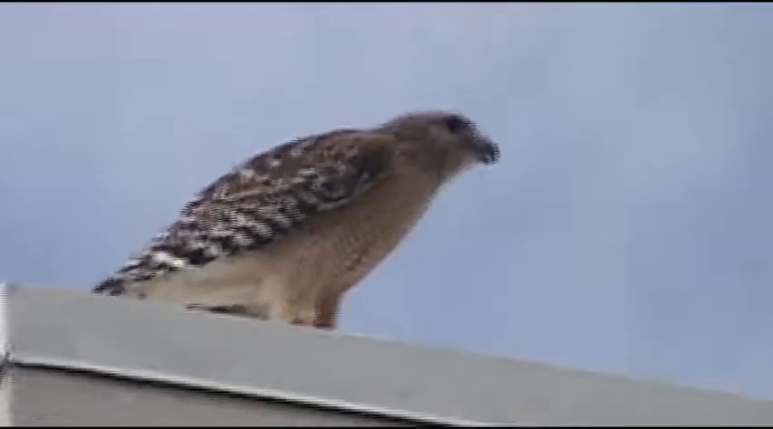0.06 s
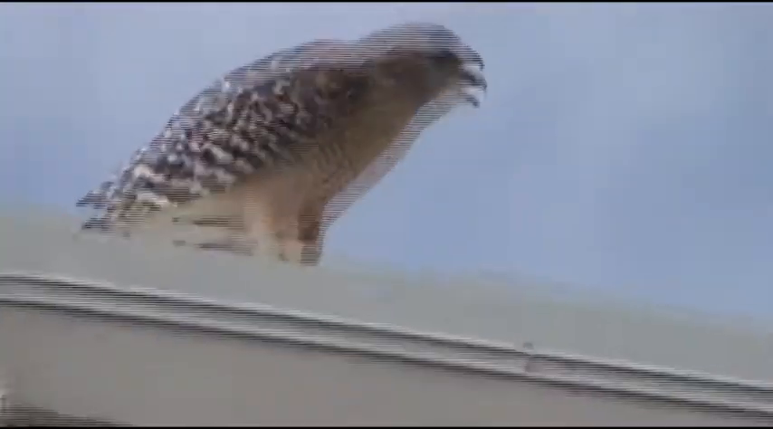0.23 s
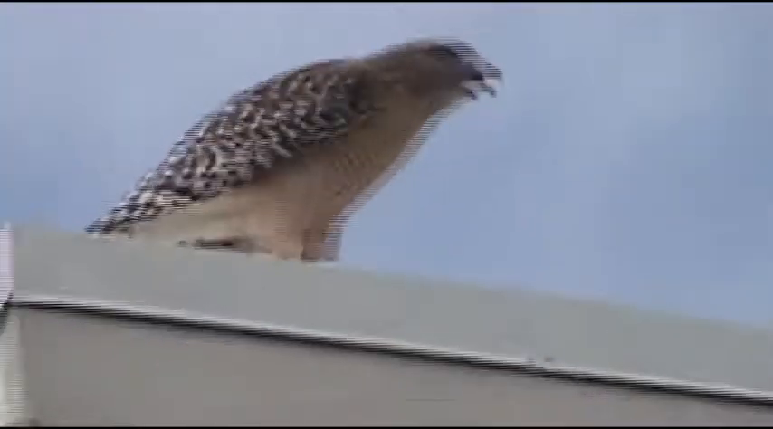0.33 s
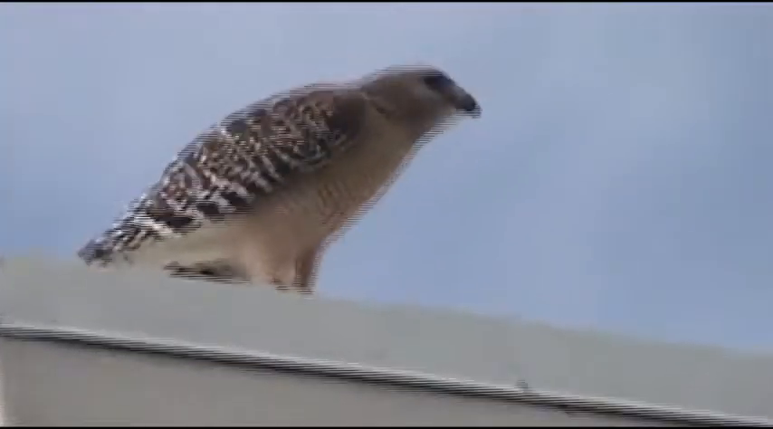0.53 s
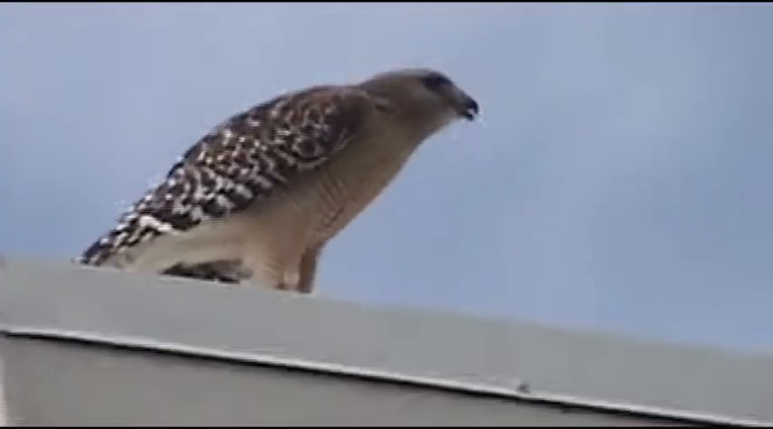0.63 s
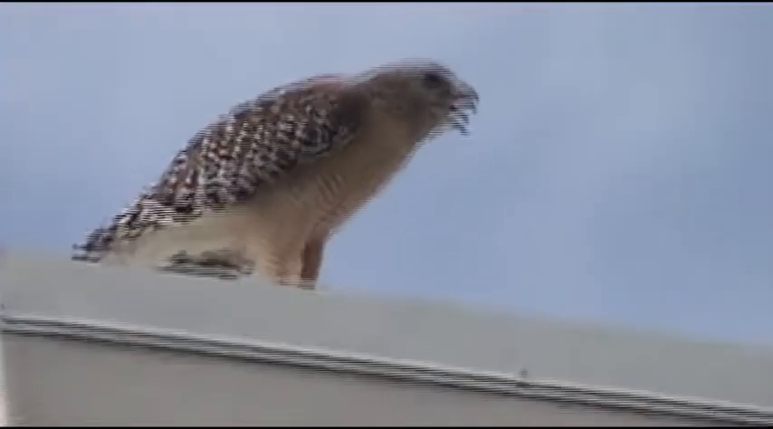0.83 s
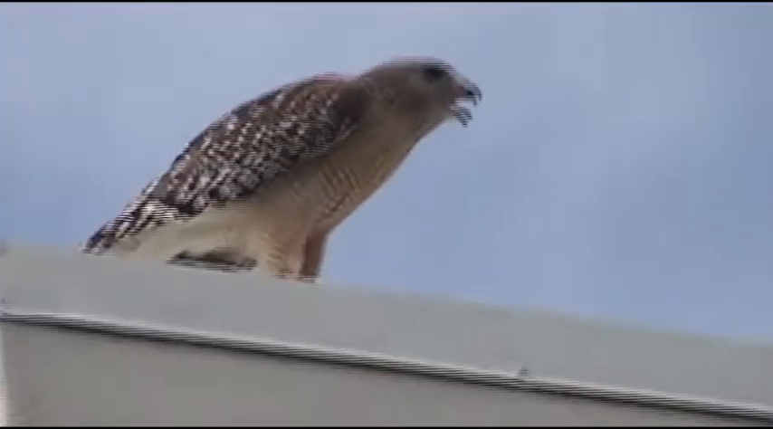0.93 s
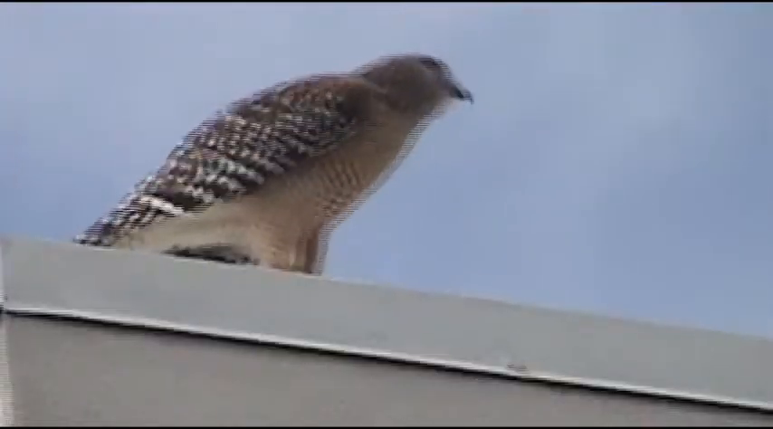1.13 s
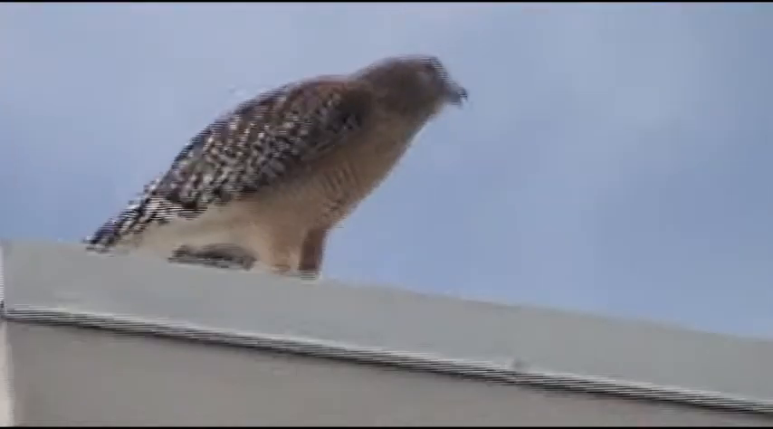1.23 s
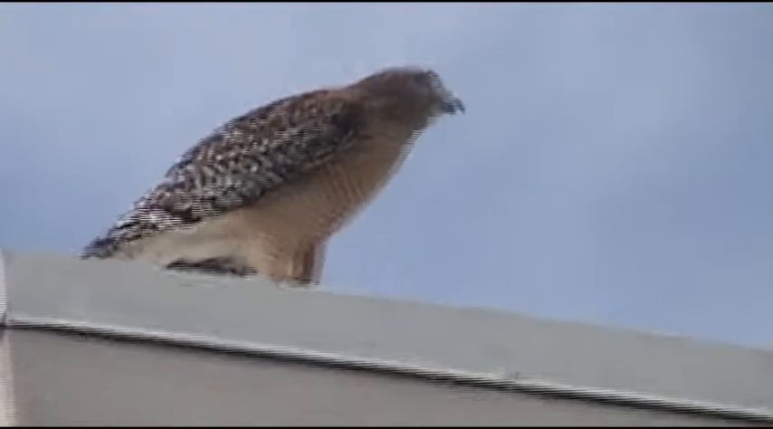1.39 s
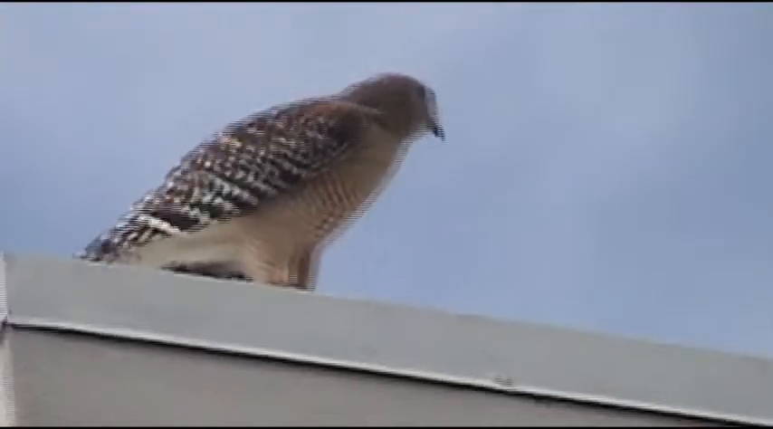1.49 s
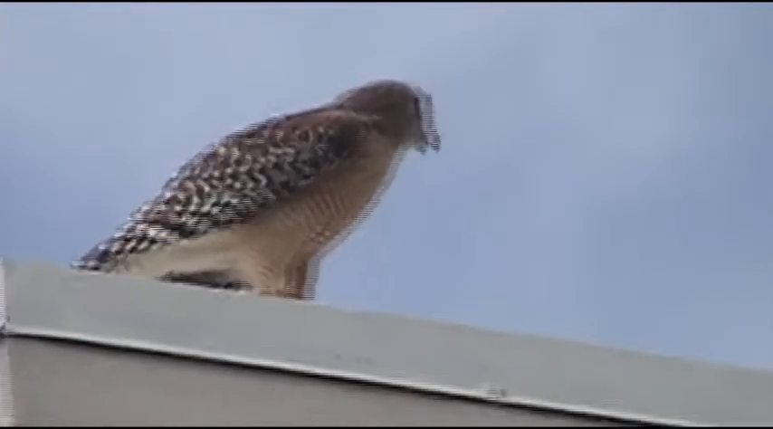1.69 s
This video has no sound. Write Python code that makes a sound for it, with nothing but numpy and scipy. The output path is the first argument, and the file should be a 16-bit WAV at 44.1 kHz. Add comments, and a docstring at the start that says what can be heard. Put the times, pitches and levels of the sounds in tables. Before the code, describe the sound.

Two hoarse, rising and falling hawk screeches, with faint echo and soft wind beneath.

```python
"""Outdoors among houses, a hawk on a roof edge gives two harsh "kee-ah" cries.
Each cry rises, cracks into a rasp where the second side of the syrinx whistles along, then drops
to a clean falling note. Nearby walls answer at once and the neighbourhood rings on faintly.
Underneath are a low wind rumble, a distant wash, faint far hums and a few small ticks."""
import sys
import numpy as np
from scipy import signal
from scipy.fft import rfft, irfft
from scipy.io import wavfile
from scipy.ndimage import uniform_filter1d

SR = 44100
rng = np.random.default_rng(int(sys.argv[2]) if len(sys.argv) > 2 else 0)


def transcribe(signal):
    """Save signal, clipped to [-1, 1], as a 16-bit WAV file at the path in sys.argv[1]."""
    frames = np.atleast_2d(signal).T
    limited = np.clip(frames, -1, 1)
    pcm = np.round(limited * 32767).astype(np.int16)
    wavfile.write(sys.argv[1], SR, pcm)


N = 77175


def amp(db):
    """Decibels to gain."""
    return 10 ** (np.asarray(db) / 20)


def unit(x):
    """Scales to rms 1."""
    return x / np.sqrt(np.mean(abs(x) ** 2) + 1e-20)


def read(points, hz):
    """Reads a table on a log-frequency axis."""
    f, value = np.transpose(points)
    return np.interp(np.log(hz + 1), np.log(f + 1), value)


def add(mix, start_s, sound):
    """Mixes a sound in at start_s."""
    part = mix[max(round(start_s * SR), 0):][:len(sound)]
    part += sound[:len(part)]


def wobble(size, hz):
    """Complex random motion no faster than about hz, rms 1."""
    f = np.fft.fftfreq(size, 1 / SR)
    noise = rng.standard_normal(size) + 1j * rng.standard_normal(size)
    return unit(np.fft.ifft(np.fft.fft(noise) / (1 + (f / hz) ** 2)))


def soften(control, width_s=0.0036):
    """Rounds the steps of a control."""
    return uniform_filter1d(control, int(width_s * SR), axis=-1, mode="nearest")


def stereo_pair(a, b, correlation):
    """Left and right from two independent noises."""
    return np.array([a, correlation * a + np.sqrt(1 - correlation ** 2) * b])


# Outdoor noise spectrum. Each row: frequency in Hz, relative density in dB.
AIR_SPECTRUM_DB = [(13, -31), (22, -14), (64, -7), (133, -7), (222, -10), (253, -11), (306, -10),
                   (538, -15.5), (599, -12.5), (667, -13.5), (1300, -20.5), (1900, -26.5), (2490, -24.5),
                   (3430, -30.5), (9520, -43.5), (11500, -52), (13500, -89.5)]
# Stereo width. Each row: frequency in Hz, left-right correlation.
AIR_CORRELATION = [(25, 0.63), (70, 0.99), (150, 0.98), (300, 0.93), (600, 0.64), (1300, 0.69),
                   (3000, 0.23), (7000, 0.23)]
# Rumble and wash envelopes. Each row: time in seconds, level in dB.
WIND_LEVEL_DB = [(0.0, -37), (0.594, -39.5), (0.642, -37.5), (0.848, -41), (1.306, -38), (1.598, -43.5),
                 (1.75, -42.5)]
WASH_LEVEL_DB = [(0.0, -47.5), (0.014, -40.5), (0.13, -43.5), (1.676, -42.5), (1.75, -44)]


def wind_and_wash(crossover_hz=265):
    """Low wind rumble and a distant wash above it, both easing off slowly."""
    hz, t = np.fft.rfftfreq(N, 1 / SR), np.arange(N) / SR
    a, b = rfft(rng.standard_normal((2, N)))
    spectrum = stereo_pair(a, b, read(AIR_CORRELATION, hz)) * amp(read(AIR_SPECTRUM_DB, hz))
    low = 1 / (1 + (hz / crossover_hz) ** 8)
    return sum(amp(np.interp(t, *np.transpose(levels))) * unit(irfft(spectrum * band, N))
               for levels, band in [(WIND_LEVEL_DB, low), (WASH_LEVEL_DB, 1 - low)])


# Far hums. Each row: start in seconds, end in seconds, frequency in Hz, level in dB.
FAR_HUMS = [(0, .13, 604, -45), (0, .04, 192, -36), (.05, 1.45, 130, -48)]


def far_hums(waver_hz=13, fade_s=0.01):
    """Faint tones from far off, wavering in level and phase."""
    t, out = np.arange(N) / SR, np.zeros(N)
    for start, end, hz, db in FAR_HUMS:
        tone = (np.exp(2j * np.pi * hz * t) * (1 + wobble(N, waver_hz))).real
        gate = np.clip(np.minimum(t - start, end - t) / fade_s + .5, 0, 1)
        out += amp(db) * unit(tone) * gate
    return out


# Small ticks. Each row: peak time in seconds, centre frequency in Hz, gain in dB.
SMALL_TICKS = [(.013, 8000, -46), (.014, 3180, -40), (.178, 7300, -48), (.832, 3514, -32)]


def ticks(rise_s=0.0006):
    """Faint ticks, each a brief burst of narrow-band noise."""
    t, out = np.arange(900) / SR, np.zeros(N)
    envelope = t / rise_s * np.exp(2 - t / rise_s) / 2
    for peak_s, hz, db in SMALL_TICKS:
        ring = (wobble(len(t), hz=810) * np.exp(2j * np.pi * hz * t)).real
        add(out, peak_s - rise_s, amp(db) * ring * envelope)
    return out


# Wall echoes. Each row: nominal delay in seconds, gain in dB.
WALL_ECHOES = [(.0045, -18.5), (.009, -14.5), (.014, -35), (0.02, -23.5), (.033, -28.5), (.052, -22),
               (.078, -20)]
# Scatter spectrum. Each row: frequency in Hz, relative level in dB.
SCATTER_COLOUR_DB = [(1300, -1), (2200, 4), (2550, -1.5), (3100, 0), (4000, 0), (6400, 1.5), (9000, 1)]
# Scatter decay. Each row: frequency in Hz, time to fall 60 dB in seconds.
SCATTER_T60_S = [(1200, 2.94), (2500, 1.37), (4000, 0.87), (7000, 1.3), (13000, 0.48)]


def surroundings(voice, scatter_db=-18):
    """A few wall echoes and a long, faint, uneven scatter from houses and trees."""
    noise = stereo_pair(*rng.standard_normal((2, N)), correlation=0.52)
    hz, t, spectra = signal.stft(noise, SR, nperseg=256)
    decay_db = read(SCATTER_COLOUR_DB, hz)[:, None] - 60 * t / read(SCATTER_T60_S, hz)[:, None]
    response = signal.istft(spectra * amp(decay_db), SR, nperseg=256)[1]
    response *= amp(unit(wobble(response.shape[1], hz=25).real))  # 1 dB rms of unevenness
    response *= amp(scatter_db) / np.linalg.norm(response[0])
    for delay_s, db in WALL_ECHOES:
        for side in response:
            add(side, delay_s * rng.uniform(0.95, 1.03), amp([db]))
    return signal.fftconvolve(voice[None], response, axes=1)[:, :N]


# Direct-path balance. Each row: frequency in Hz, left minus right in dB.
BALANCE_DB = [(1200, 0.3), (2400, 3.5), (3100, -0.5), (4100, -2.5), (7500, 0.5), (13000, -0.5)]
# Direct-path phase. Each row: frequency in Hz, left lead in radians.
LEFT_LEAD_RAD = [(1200, 0), (1700, -0.11), (2800, -0.35), (4300, -0.49), (7000, 0.36), (9000, 0)]


def direct_path(voice):
    """The direct sound reaches left and right with slightly different level and phase."""
    hz = np.fft.rfftfreq(N, 1 / SR)
    lean = amp(read(BALANCE_DB, hz) / 2) * np.exp(.5j * read(LEFT_LEAD_RAD, hz))
    return irfft(rfft(voice) * np.array([lean, 1 / lean]), N)


# Breath spectrum. Each row: frequency in Hz, relative level in dB.
BREATH_SPECTRUM_DB = [(900, -32), (1900, -23), (2500, -11.5), (3100, -2.5), (3600, -11.5), (6500, -12),
                      (8500, -32), (11000, -34), (13000, -42)]


def breath(throat_db, rough):
    """Air hissing in the throat, louder as the voice roughens."""
    size = len(rough)
    shape = amp(read(BREATH_SPECTRUM_DB, np.fft.rfftfreq(size, 1 / SR)))
    hiss = unit(irfft(rfft(rng.standard_normal(size)) * shape, size))
    return amp(throat_db - 27 + 19 * rough) * hiss


# Whistles. Each row: start and end in seconds, start and end pitch in Hz, share of throat-band power.
SYRINX_WHISTLES = [(.273, .293, 2480, 2470, .9), (.369, .377, 2480, 2470, .4),
                   (.939, .945, 2460, 2500, .65), (.944, .959, 3200, 3140, .6)]


def syrinx_whistle(t, octave_db=-20):
    """The second side of the syrinx whistles; returns the tone and the power share it takes."""
    tone, taken = np.zeros((2, len(t)))
    for start, end, from_hz, to_hz, share in SYRINX_WHISTLES:
        power = abs(soften(share * ((t > start) & (t < end))))
        phase = 2 * np.pi * np.cumsum(np.interp(t, [start, end], [from_hz, to_hz])) / SR
        tone += np.sqrt(power) * (np.sin(phase) + amp(octave_db) * np.sin(2 * phase))
        taken += power
    return tone, taken


JITTER_HZ, RASP_HZ, FRAY_HZ = 340, 290, 9000


def syrinx_partials(pitch_hz, rough, doubling, tripling, odd):
    """Jittering harmonics; period doubling and tripling put half and third partials between them."""
    size = len(pitch_hz)
    jitter = (.0012 + .04 * rough) * wobble(size, JITTER_HZ).real
    cycles = np.cumsum(pitch_hz * (1 + jitter)) / SR
    partials = []
    for k in range(1, 13):
        partials += [(k, odd if k % 2 else np.ones(size)), (k + 1 / 2, doubling),
                     (k + 1 / 3, tripling / 2), (k + 2 / 3, tripling)]
    multiples, weights = map(np.array, zip(*partials))
    hz = np.outer(multiples, pitch_hz)
    rasps = np.clip(rough + .55 / (1 + (FRAY_HZ / hz) ** 8), 0, 1)  # the highest partials fray more
    waves = []
    for multiple, rasp in zip(multiples, rasps):
        carrier = np.exp(2j * np.pi * (multiple * cycles + rng.random()))
        waves.append((carrier * (np.sqrt(1 - rasp ** 2) + rasp * wobble(size, RASP_HZ))).real)
    return np.array(waves), hz, weights * (hz < SR / 2)


# Low, throat and treble bands of the voice. Each row: frequency in Hz, relative level in dB.
LOW_BAND_DB = [(500, -25), (900, -19.5), (1150, -7.5), (1580, -1.5), (1900, -12), (2500, -59)]
THROAT_BAND_DB = [(1300, -49.5), (1800, -6), (2050, -15), (2250, -3.5), (3150, -9), (3450, -22.5),
                  (3900, -43), (5000, -77)]
TREBLE_BAND_DB = [(2400, -49), (3100, 3.5), (3600, 1), (4700, -0.5), (5500, -6.5), (6400, -5.5),
                  (7300, -10.5), (8200, -22.5), (10500, -31.5), (11500, -33.5), (12400, -31.5),
                  (13400, -26.5), (13900, -28.5), (14500, -57)]


def throat_filter(waves, hz, weights, band_gains):
    """The throat shapes the partials in three bands, each with its own gain."""
    gains = 0
    for gain, shape in zip(band_gains, [LOW_BAND_DB, THROAT_BAND_DB, TREBLE_BAND_DB]):
        band = weights * amp(read(shape, hz))
        gains += gain * band / np.sqrt((band ** 2).sum(0) + 0.063)
    return (gains * waves).sum(0)


# Voice registers, each held until the next. Each row: start in seconds, then roughness,
# period doubling, period tripling and odd-harmonic weight, all 0-1.
VOICE_REGISTERS = [(.2, .45, .35, 0, 1), (.229, .2, .06, 0, 1), (.241, .27, .42, 0, 1),
                   (.256, .1, .14, 0, 1), (.266, .25, .1, .05, .8), (.272, .27, .08, .8, .5),
                   (.292, .14, .03, .1, .2), (.309, .25, .05, .08, .4), (.32, .1, .1, .05, .12),
                   (.35, .22, .1, .1, .15), (.376, .05, 0, 0, 1), (.435, .42, .3, 0, 1),
                   (.83, .55, .4, 0, 1), (.855, .22, .1, 0, 1), (.861, .27, .33, 0, 1),
                   (.88, .06, 0, .13, 1), (.905, .07, 0, .3, 1), (.918, .1, 0, .55, 1),
                   (.938, .33, .1, .3, .6), (.958, .16, .06, .06, .8), (.975, .025, 0, 0, 1),
                   (1.074, .33, .15, 0, 1), (1.084, .6, .5, 0, 1)]
# Chokes at register changes. Each row: centre in seconds, depth in dB, width in seconds.
VOICE_CRACKS = [(.2715, -9, .002), (.3185, -10, .0015), (.9365, -6, .002), (.985, -5, .006)]


def cry(pitch_curve, levels, fade_s=0.0036):
    """Both sides of the syrinx plus breath, cracking between registers; returns start and sound."""
    times, *bands_db = np.transpose(levels)
    t = np.arange(times[0], times[-1], 1 / SR)
    pitch_hz = np.interp(t, *np.transpose(pitch_curve))
    choke_db = sum(db * np.exp(-((t - centre) / width) ** 2) for centre, db, width in VOICE_CRACKS)
    low_db, throat_db, treble_db = (np.interp(t, times, db) + choke_db for db in bands_db)
    starts, *qualities = np.transpose(VOICE_REGISTERS)
    register = np.maximum(np.searchsorted(starts, t) - 1, 0)
    rough, doubling, tripling, odd = soften(np.array(qualities)[:, register])
    whistle, taken = syrinx_whistle(t)
    waves, hz, weights = syrinx_partials(pitch_hz, rough, doubling, tripling, odd)
    throat_gain = amp(throat_db) * np.sqrt(np.clip(1 - taken, .05, 1))
    voiced = throat_filter(waves, hz, weights, [amp(low_db), throat_gain, amp(treble_db)])
    shimmer = 1 + .03 * wobble(len(t), JITTER_HZ).real
    sound = np.sqrt(2) * (amp(throat_db) * whistle + voiced) * shimmer + breath(throat_db, rough)
    gate = np.clip(np.minimum(t - t[0], t[-1] - t) / fade_s, 0, 1)
    return t[0], sound * gate


# Pitch of each cry. Each row: time in seconds, fundamental in Hz.
FIRST_PITCH_HZ = [(0.203, 833.2), (0.221, 976.4), (0.231, 1209), (0.245, 1345), (0.263, 1398),
                  (0.269, 1495), (0.287, 1476), (0.293, 1612), (0.317, 1501), (0.321, 1199), (0.369, 1094),
                  (0.377, 1231), (0.417, 1181), (0.435, 1099), (0.447, 777.2), (0.46, 661.9)]
SECOND_PITCH_HZ = [(0.835, 916.0), (0.849, 1058), (0.855, 1232), (0.857, 1273), (0.871, 1399),
                   (0.885, 1445), (0.893, 1557), (0.939, 1507), (0.947, 1535), (0.965, 1420), (0.973, 1293),
                   (1.039, 1246), (1.069, 1202), (1.081, 1119), (1.083, 1081), (1.091, 864.3),
                   (1.105, 708.7)]
# Envelope of each cry. Each row: time in seconds, then low, throat and treble band levels in dB.
FIRST_LEVELS_DB = [(0.203, -66, -46, -60), (0.209, -51, -41, -46.5), (0.235, -40, -24.5, -24),
                   (0.261, -29.5, -12.5, -27), (0.269, -29.5, -15, -30.5), (0.279, -54, -13, -20),
                   (0.289, -34, -14.5, -24.5), (0.301, -34, -23, -14), (0.315, -29.5, -16.5, -32),
                   (0.333, -40, -15.5, -32.5), (0.349, -62, -24.5, -36), (0.375, -31, -17, -35),
                   (0.399, -40, -28, -34), (0.415, -48.5, -17.5, -31.5), (0.429, -33.5, -28, -33.5),
                   (0.443, -47.5, -28, -50), (0.46, -49, -29.5, -48.5)]
SECOND_LEVELS_DB = [(0.835, -53, -34, -53), (0.845, -46, -32.5, -35.5), (0.861, -40, -20.5, -25),
                    (0.881, -26, -15, -27), (0.889, -33.5, -13.5, -27.5), (0.923, -30.5, -27, -26.5),
                    (0.935, -39, -17, -28.5), (0.943, -30, -15, -28), (0.961, -33.5, -16, -37),
                    (1.017, -28.5, -13.5, -31.5), (1.043, -34, -16, -33), (1.071, -42, -21, -30.5),
                    (1.087, -44.5, -25, -49), (1.105, -57, -39, -54)]


def hawk():
    """Two cries, each rising and then falling in pitch."""
    voice = np.zeros(N)
    add(voice, *cry(FIRST_PITCH_HZ, FIRST_LEVELS_DB))
    add(voice, *cry(SECOND_PITCH_HZ, SECOND_LEVELS_DB))
    return voice


def scene():
    """The hawk, its echoes and the open air."""
    voice = hawk()
    return direct_path(voice) + surroundings(voice) + wind_and_wash() + far_hums() + ticks()


def record(dry):
    """Steep low-pass at 13.9 kHz."""
    lowpass = signal.firwin(511, 13900, window=("kaiser", 9), fs=SR)
    return signal.oaconvolve(dry, lowpass[None], "same")


dry = scene()
out = record(dry)
transcribe(out)
```